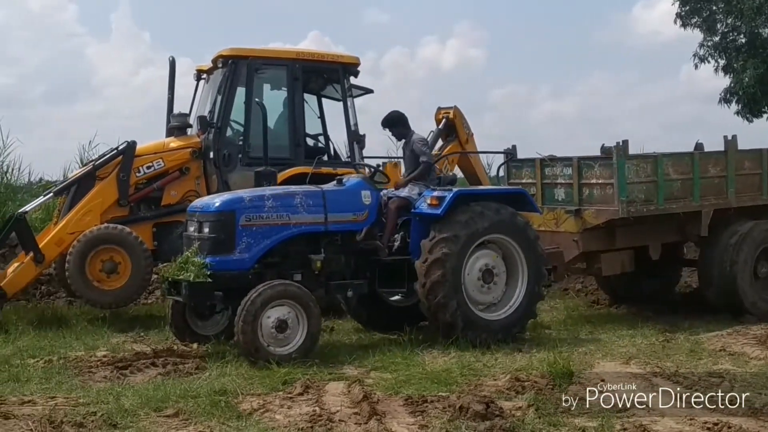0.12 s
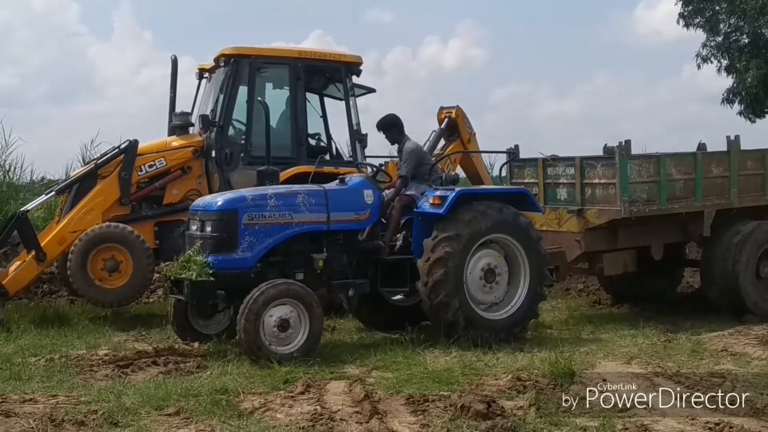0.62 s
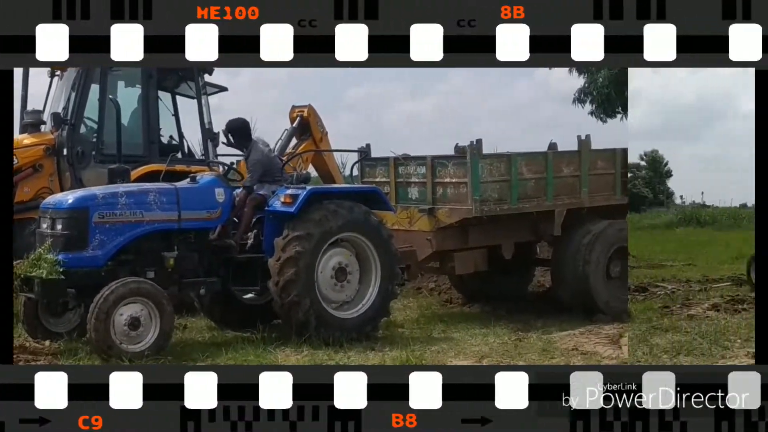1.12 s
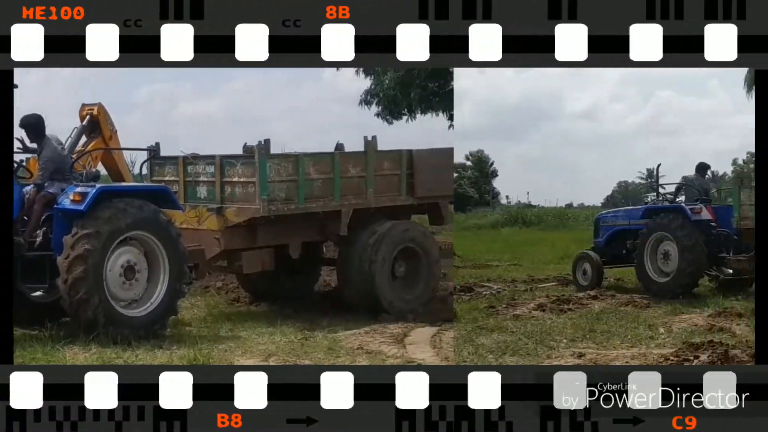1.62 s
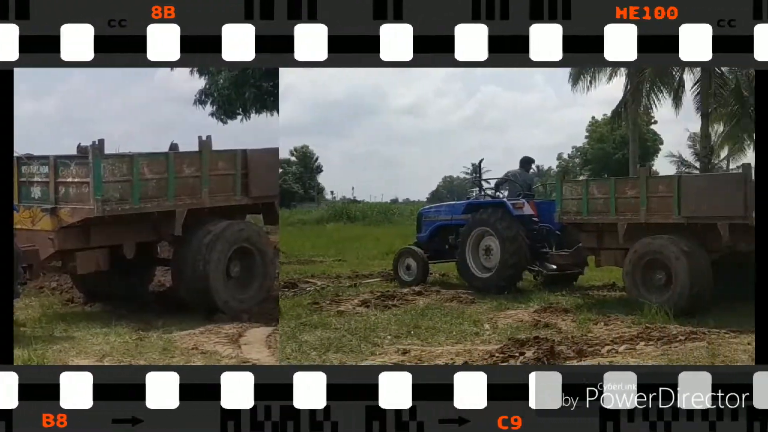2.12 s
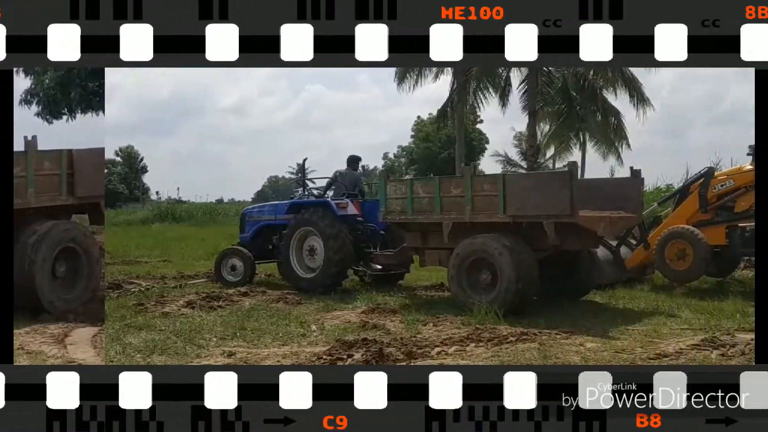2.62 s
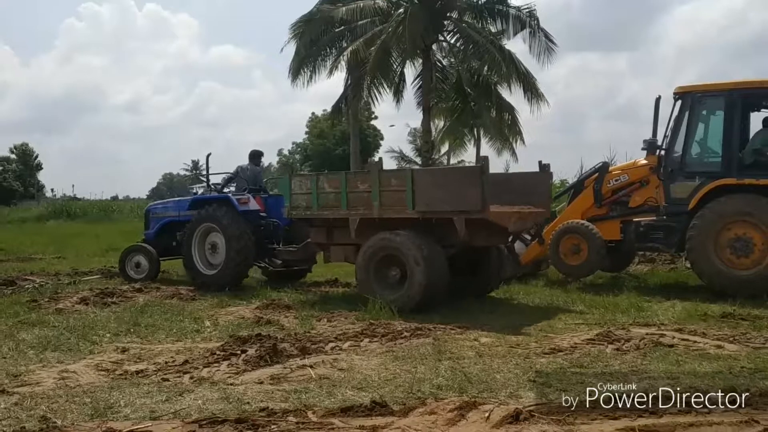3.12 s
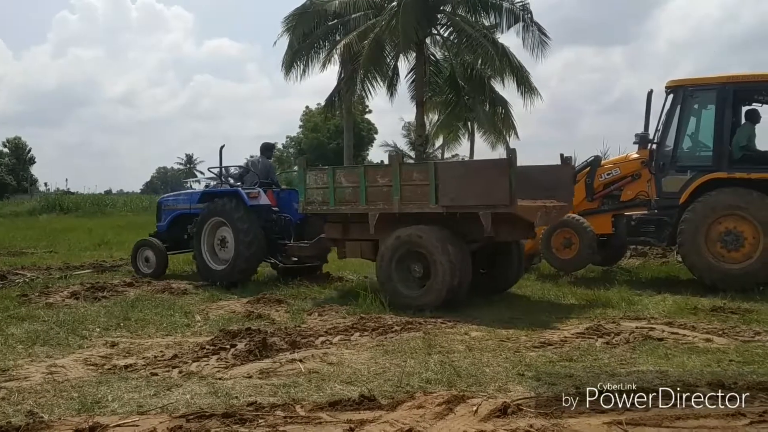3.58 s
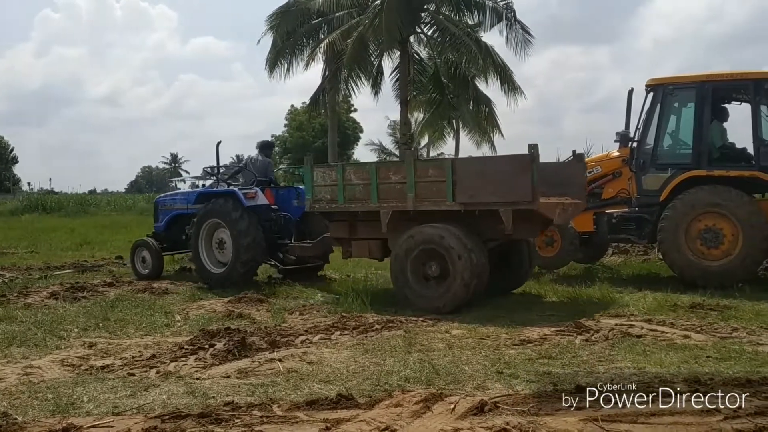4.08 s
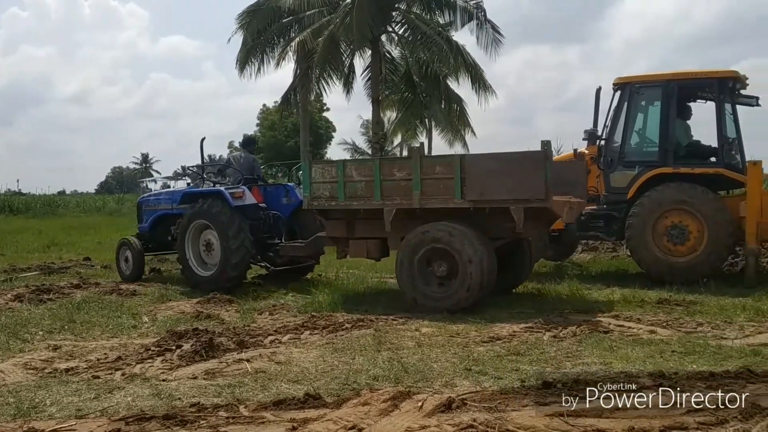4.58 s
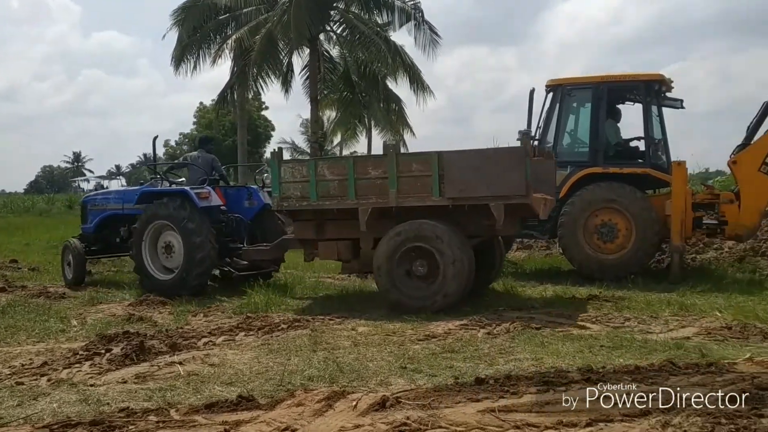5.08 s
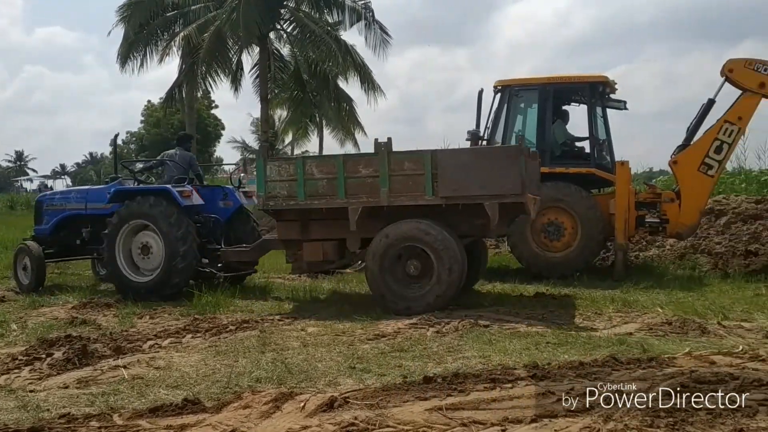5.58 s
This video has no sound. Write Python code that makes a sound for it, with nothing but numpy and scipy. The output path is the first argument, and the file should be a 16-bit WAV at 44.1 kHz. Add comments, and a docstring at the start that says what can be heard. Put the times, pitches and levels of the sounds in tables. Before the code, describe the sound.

In an open field, a tractor's slow, uneven diesel knock sits over a loader's deep steady throb, close and loud. Just before two seconds it cuts to a quieter, more distant view: the loader revs higher with a rough drone while a steel trailer rattles and clanks, hardest near four seconds. A small bird trills, mostly left. Stereo phone microphone, dry outdoors.

```python
"""A three-cylinder tractor knocks at idle over the throb of a four-cylinder loader, close by in an open field.
After a cut, a second scene fades in further off: the loader revs higher, pushing a steel trailer that clanks.
A small bird trills, mostly on the left. Exhausts are sums of harmonics of the firing rate; knocks and clanks
are short forces exciting resonances; roar is filtered noise pulsed by the firing; birdsong is gliding tones."""
import sys
import numpy as np
from scipy import signal
from scipy.fft import rfft, irfft
from scipy.io import wavfile
from scipy.ndimage import uniform_filter1d

SR = 44100
rng = np.random.default_rng(int(sys.argv[2]) if len(sys.argv) > 2 else 0)


def int16_out(signal):
    """Quantize to a 16-bit WAV file."""
    q = np.round(np.clip(np.atleast_2d(signal).T, -1, 1) * 32767)
    wavfile.write(sys.argv[1], SR, q.astype(np.int16))


def makeup_ratio(level_db):
    """Linear amplitude ratio for a level in decibels (20 dB per factor of ten)."""
    decades = np.asarray(level_db, float) / 20
    return 10 ** decades


N = 251811
T = np.arange(N) / SR
CUT_S = 1.876  # the close scene ends
FADE_START_S, FADE_S = 1.904, 0.08  # start and time constant of the distant scene's swell


def curve(table):
    """Linear interpolation: each column of a time table, one value a sample."""
    s, *columns = np.transpose(table)
    return [np.interp(T, s, c) for c in columns]


def on_log(hz, table):
    """Logarithmic frequency axis: a spectrum table read between its points."""
    f, v = np.transpose(table)
    return np.interp(np.log(hz + 1), np.log(f), v)


def level(x, db):
    """Root-mean-square normalization to a level in dB."""
    return x * makeup_ratio(db) / np.sqrt(np.mean(x ** 2))


def colour(x, table, size=8192):
    """Minimum-phase filtering: the folded cepstrum gives a causal response of the tabled magnitude."""
    cepstrum = irfft(on_log(np.fft.rfftfreq(size, 1 / SR), table) * np.log(10) / 20)
    cepstrum[1:size // 2] *= 2
    cepstrum[size // 2 + 1:] = 0
    response = irfft(np.exp(rfft(cepstrum)))
    return signal.fftconvolve(np.atleast_2d(x), response[None], axes=1)[:, :N]


# coherence of the two microphone ports: (frequency [Hz], left-right correlation [1])
LIKENESS = [(130, 1), (430, 0.87), (700, 1), (950, 0.41), (1300, 0.52), (1750, 0.032), (2500, 0.25),
            (3000, 0.028), (4000, 0.085), (4800, 0.23), (6500, 0.07)]


def ports(alike=0):
    """Spatial coherence: white noise at two ports, alike in the bass, less so in the treble; alike raises it."""
    c = np.clip(on_log(np.fft.rfftfreq(N, 1 / SR), LIKENESS), -1, 1)
    c = np.clip(c + alike * (1 - c), -1, 1)
    mid, side = rfft(rng.standard_normal((2, N)))
    mid = mid * np.sqrt((1 + c) / 2)
    side = side * np.sqrt((1 - c) / 2)
    return irfft(mid + side * np.array([[1], [-1]]), N)


def ring(x, hz, width):
    """Simple resonance of given bandwidth, with unit gain at its centre."""
    return signal.lfilter(*signal.iirpeak(hz, hz / width, fs=SR), x)


def walk(rate):
    """Slow random modulation: levels held 1 / rate s and slewed twice; spread near 1."""
    k = int(SR / rate)
    held = np.repeat(rng.standard_normal(N // k + 1), k)
    return 1.4 * uniform_filter1d(uniform_filter1d(held, k), k)[:N]


def bursts(times, sizes, lengths, rise_s):
    """Impact envelopes: a quick rise, then an exponential decay."""
    env = np.zeros(N)
    for t, size, length in zip(times, sizes, lengths):
        a = int(max(t, 0) * SR)
        u = T[:min(int(8 * length * SR), N - a)]
        env[a:a + len(u)] += size * (1 - np.exp(-u / rise_s)) * np.exp(-u / length)
    return env


def cycles(turns):
    """Phase crossing: the times after the cut at which a running count of firings passes a whole number."""
    times = T[1:][np.diff(np.floor(turns)) > 0]
    return times[times > CUT_S]


# thin high hiss: (frequency [Hz], relative density [dB per Hz])
THIN = [(7000, -37), (10500, -8.5), (13000, -11.5), (15000, -2.5)]


def thin_hiss():
    """Filtered noise: a thin high hiss in the distant scene, slowly dying away."""
    start_db, slope_db_per_s = -56.5, -2
    return level(colour(ports(), THIN), 0) * makeup_ratio(start_db + slope_db_per_s * (T - FADE_START_S))


# bird trills: (first note [s], last note [s], relative level [dB], left minus right [dB],
# mean starting pitch [Hz])
TRILL = [(1.4289, 1.5182, -32, 19, 6460), (1.837, 1.87, -26.5, 19, 6580), (2.823, 2.9392, -45, 13, 6360),
         (3.1815, 3.1822, -45, 7, 6670), (3.5172, 3.6077, -48.5, 12, 6630), (4.113, 4.144, -48, 13, 7480),
         (4.2, 4.1994, -46, 10, 6240), (4.435, 4.59, -50.5, 8, 7250)]


def trill_notes():
    """Periodic repetition: evenly spaced notes of each trill, (s, level dB, pan dB, pitch Hz)."""
    note_gap_s, ends_db, pitch_scatter = .0305, -2.5, .02  # in trills of three notes or more, the ends are softer
    for first, last, db, pan_db, hz in TRILL:
        count = round((last - first) / note_gap_s) + 1
        place = np.linspace(-1, 1, count) * (count > 2)
        pitch = hz * (1 + pitch_scatter * rng.standard_normal(count))
        times = np.linspace(first, last, count)
        yield from zip(times, db + ends_db * place ** 2, np.full(count, pan_db), pitch)


# bird whistles: (start [s], length [s], from [Hz], to [Hz], level [dB], left minus right [dB])
WHISTLES = [(3.117, 0.045, 7650, 6430, -52.5, 9), (4.4, 0.024, 6620, 6640, -53, -5)]


def bird():
    """Frequency modulation: trill notes are hoarse upward sweeps, whistles clean glides; a short echo follows."""
    out = np.zeros((2, N))
    notes = [(s, .008, hz, 1.32 * hz, db, pan, 1.3) for s, db, pan, hz in trill_notes()]
    whistles = [tuple(w) + (0,) for w in WHISTLES]
    for s, length, from_hz, to_hz, db, pan_db, hoarse in notes + whistles:
        u = T[:int(length * SR)] / length
        glide = u ** (1.2 if hoarse else .5)
        phase = 2 * np.pi * np.cumsum(from_hz + (to_hz - from_hz) * glide) / SR
        # an uneven voice: shaking level, and a second, higher tone
        shake = 1 + hoarse * 3 * uniform_filter1d(rng.standard_normal((2, 2000)), size=11)[:, :len(u)]
        note = shake[0] * np.sin(phase) + hoarse * makeup_ratio(-13.0) * shake[1] * np.sin(1.4 * phase)
        swell = np.sin(np.pi * u ** 0.55)
        gain = makeup_ratio(db + np.array([[.5], [-.5]]) * pan_db)
        a = int(s * SR)
        out[:, a:a + len(u)] += gain * swell * note / (1 + hoarse)
    tail = rng.standard_normal((2, 3000)) * np.exp(-T[:3000] / 0.011) * makeup_ratio(-30)
    return out + signal.fftconvolve(out, tail, axes=1)[:, :N]


# trailer clanks: (time [s], panel level [dB], then relative to it: floor boom before a 9 dB lift [dB],
# latches [dB], chains [dB]; rattle decay [s])
CLANKS = [(1.378, -31.5, -8.5, -5, -12, .025), (1.858, -37, -5, 9, 6, 0.004),
          (2.451, -51, -5, 6, -1, 0.0068), (3.249, -49, 6, 4, 4, 0.021),
          (3.398, -38.5, 1.5, -8.5, -4, 0.028), (3.538, -43, 1, -13, -10, 0.019),
          (3.949, -30.5, -10, -8, -8.5, 0.014), (3.968, -32, -16, -11.5, -11.5, 0.014),
          (4.0, -42, -1, -22, -26, 0.034), (4.084, -39.5, -10, -0.5, -1, 0.017),
          (4.15, -39.5, -6, 1.5, 3, 0.016), (4.168, -41.5, -3.5, -1.5, -9, 0.025),
          (4.4, -49, 2, -21, -20, 0.017), (4.653, -40, 2.5, -4.5, -5.5, 0.015),
          (4.674, -41, 4, -4, -19, 0.0098), (4.785, -49, 0, -3, -2, 0.027),
          (4.8, -47, -12, -2.5, -2, 0.024), (4.828, -40.5, -2, -0.5, -6, 0.016),
          (4.88, -47.5, 1, -5, 1, 0.011), (5.185, -45, 2, -8.5, -18, 0.025),
          (5.522, -56.5, 6, 7, 10, 0.012), (5.652, -60, -11, 3, 11, 0.034),
          (5.672, -61.5, -7, 5, -3, 0.019), (5.701, -38, -11, -8, -3.5, .01)]
# modes of the steel: (frequency [Hz], relative level [dB], nominal 60 dB decay [s])
TRAILER = [(260.4, -5, 0.22), (298.4, -12, 0.42), (569.7, -1, 0.072), (622.4, -6, 0.39), (720, -3, 0.15),
           (795, -12, 0.14), (1087, 6.5, 0.07), (1369, 0, 0.099), (1898, 1.5, 0.056), (2523, 4, 0.038),
           (3683, 7, 0.04), (4840, -1, 0.025), (4400, 3.5, 0.046)]
# rattle spectrum: (frequency [Hz], relative level [dB])
RATTLE = [(300, 4), (600, -3.5), (850, 11.5), (1200, 11), (2500, 0.5), (3300, 7), (4800, 10), (7000, -10.5),
          (11000, -15)]


def trailer():
    """Modal excitation: loose steel rattles briefly and rings: floor, side panels, latches, chains, low to high."""
    # faint chance rattles while the trailer rolls
    jolts_per_s, least_db, jolt_s = 3, -57, .014
    span_s = N / SR - CUT_S
    when, size, low, high = rng.random((int(jolts_per_s * span_s), 4)).T
    jolts = np.c_[CUT_S + when * span_s, least_db + 6 * size, -10 * low, -10 * high, -10 * low, jolt_s + 0 * when]
    s, db, boom_db, latch_db, chain_db, length = np.r_[CLANKS, jolts].T
    length = np.clip(length, .004, .1)
    grit = ports(alike=.5) * makeup_ratio(1.2 * walk(200))
    out = 0
    # relative level dB, band from Hz, to Hz
    parts = ((boom_db + 9, 0, 400), (0 * db, 400, 950), (latch_db, 950, 3500), (chain_db, 3500, SR))
    for over_db, lo, hi in parts:
        blows = grit * bursts(s, makeup_ratio(db + over_db), length, rise_s=.0011)
        # the blow itself: a push that lasts longer on the heavier, lower parts
        push_s = .08 / max(lo, 200)
        push = bursts(s + .002, makeup_ratio(db + over_db + 20), np.full(len(s), push_s), rise_s=push_s)
        struck = blows + push
        for f, d, t60 in TRAILER:
            if lo < f < hi:
                out = out + makeup_ratio(d + 18.5) * np.sqrt(t60 * 10) * ring(struck, f, 1.54 / t60)
        band = [(f, d - 40 * (not lo < f < hi)) for f, d in RATTLE]
        out = out + colour(blows, band) * makeup_ratio(5.5)
    return out


def roar(spectrum, db, phase, depth, late, alike=0):
    """Amplitude modulation: noise of fans, gears and gas flow puffs once a firing and flickers by octave."""
    puff = makeup_ratio(depth * np.cos(phase - late) + 0.84 * walk(22.23))
    rest, out = colour(ports(alike) * puff, spectrum), 0
    for hz in 150 * 2. ** np.arange(7):
        low = signal.sosfilt(signal.butter(1, hz, fs=SR, output="sos"), rest)
        rest = rest - low
        out = out + low * makeup_ratio(1.32 * walk(14))
    return level(out + rest, 0) * makeup_ratio(db)


# roar far off: spectrum (frequency [Hz], relative density [dB per Hz]), then (time [s], level [dB])
ROAR_FAR = [(15, 4), (40, -5), (70, 0.5), (110, -2), (170, -2.5), (300, -10), (700, -13.5), (2000, -20),
            (5000, -27), (9000, -33), (15000, -46.5)]
ROAR_FAR_DB = [(2.25, -42.5), (3.16, -41.5), (3.44, -39.5), (3.9, -41.5), (4.08, -39.5), (4.28, -42.5),
               (5.0, -42.5), (5.32, -46), (5.71, -43)]


def far_roar(phase):
    """Broadband flow noise, modulated by the distant loader's firing."""
    return roar(ROAR_FAR, curve(ROAR_FAR_DB)[0], phase, depth=1.8, late=1.1, alike=0.11)


# roar close by: spectrum (frequency [Hz], relative density [dB per Hz]), then (time [s], level [dB])
ROAR_NEAR = [(15, -35), (45, -0.5), (75, -1.5), (110, -9), (170, -4), (300, -12.5), (700, -14), (2000, -18),
             (5000, -26.5), (9000, -34.5), (15000, -42)]
ROAR_NEAR_DB = [(0.0, -30), (1.1, -29.5), (1.718, -31.5), (1.87, -33)]


def near_roar(phase):
    """Broadband flow noise, modulated by the close loader's firing."""
    return roar(ROAR_NEAR, curve(ROAR_NEAR_DB)[0], phase, depth=1.46, late=3.54)


# gear whines of the distant loader: (frequency [Hz], width of each of two filters [Hz], level [dB])
WHINES = [(1138, 73, -60.5), (1234, 15, -82), (578, 32, -67), (6230, 38, -70.5)]


def loader_gear(phase):
    """Narrow-band noise and impulsive excitation: wavering whines, and an uneven valve tick each firing."""
    whine = sum(level(ring(ring(ports(), f, w), f, w), d) for f, w, d in WHINES)
    mean_db, scatter_db, tick_s = -48, 3, .004
    times = cycles(phase / (2 * np.pi))
    size = makeup_ratio(mean_db + scatter_db * rng.standard_normal(len(times)))
    ticks = ports() * bursts(times, size, np.full(len(times), tick_s), rise_s=0.0011)
    spectrum = [(400, -18), (900, -9), (1750, -21), (2450, 12), (3500, -28), (4600, -27), (6000, -27),
                (10000, -11)]  # Hz, dB
    return whine + colour(ticks, spectrum, size=1024)


def valve():
    """Impulse response: a loose valve's click excites one bright resonance every fourth firing."""
    first_s, click_db, hz, width_hz = .086, -15, 4820, 190
    firing_hz = LOADER_NEAR[1][1]
    times = np.arange(first_s, CUT_S, 4 / firing_hz)
    size = makeup_ratio(click_db + 0.5 * rng.standard_normal(len(times)))
    size = size * np.where(times < 1.4, 1, makeup_ratio(-4.5))
    clicks = ports() * bursts(times, size, np.full(len(times), .004), rise_s=0.0016)
    return ring(clicks, hz, width_hz)


def exhaust(hz, db, orders, fire_s, skew, wobble_db):
    """Fourier synthesis: a pulse a firing, as wavering partials; skew pi is a dip, -pi / 2 a dip and rebound."""
    turns = np.cumsum(hz) / SR
    phase = 2 * np.pi * (turns - turns[int(fire_s * SR)])
    tone = 0
    for k, d in orders:
        strength = makeup_ratio(d + wobble_db * np.sqrt(k) * walk(6))
        tone = tone + strength * np.cos(k * phase + skew + .08 * k * walk(8))
    return np.sqrt(2) * makeup_ratio(db) * tone, phase


# pump hum on the loader, sagging under load: (time [s], mean frequency [Hz], level [dB])
PUMP = [(1.9, 239.7, -58), (3.05, 239.6, -57.5), (3.2, 227, -55), (4.2, 228.2, -56), (4.6, 227, -58),
        (5.71, 228, -64)]


def pump():
    """Tonal radiation: a single partial, wavering in pitch and strength."""
    hz, db = curve(PUMP)
    return exhaust(hz * (1 + .006 * walk(9)), db, [(1, 0)], fire_s=3.0, skew=0, wobble_db=5)[0]


# distant loader: (time [s], firing rate [Hz], level [dB])
LOADER_FAR = [(1.9, 45.64, -40.5), (4.0, 45.64, -40.5), (5.3, 45.64, -39.5), (5.71, 45.45, -39.5)]
# its partials: (multiple of the firing rate [1], relative level [dB])
FAR_ORDERS = [(1, 0), (2, -4.5), (3, -8), (3.25, -18), (5, -24), (6, -19)]


def far_loader():
    """Harmonic series on the higher firing rate of the working loader; also returns its phase."""
    return exhaust(*curve(LOADER_FAR), FAR_ORDERS, fire_s=2.31, skew=-2.6, wobble_db=1.6)


# close loader: (time [s], firing rate [Hz], level [dB])
LOADER_NEAR = [(0, 31.9, -28.3), (.4, 31.97, -28.3), (1.87, 31.97, -28.8)]
# its partials: (multiple of the firing rate [1], relative level [dB])
NEAR_ORDERS = [(1, 0), (2, -3), (3, -4), (3.5, -19), (4, -20), (5, -18), (6, -19), (7, -20), (10, -20),
               (10.5, -24)]


def near_loader():
    """Harmonic series on the firing rate, with a few half-order partials; also returns its phase."""
    return exhaust(*curve(LOADER_NEAR), NEAR_ORDERS, fire_s=1.5694, skew=-1.4, wobble_db=.9)


# distant tractor: (time [s], firing rate [Hz], level [dB])
TRACTOR_FAR = [(1.9, 18.2, -62), (2.5, 21, -56), (2.85, 19.2, -56), (3.2, 17.4, -48), (3.6, 21.4, -67),
               (4.2, 16.3, -64), (4.6, 17.5, -46), (5.1, 20, -53), (5.71, 16, -45)]


def far_tractor():
    """Harmonic series of three partials, the second strongest; also returns the firing rate."""
    hz, db = curve(TRACTOR_FAR)
    return exhaust(hz, db, [(1, -12), (2, 0), (4, -7)], fire_s=3.0, skew=0, wobble_db=2.5)[0], hz


# close tractor: (time [s], firing rate [Hz], level [dB])
TRACTOR_NEAR = [(0, 18.6, -41), (.4, 18.7, -42), (1.45, 18.7, -42), (1.6, 17.5, -43), (1.87, 16.5, -44)]
# its partials: (multiple of the firing rate [1], relative level [dB])
TRACTOR_ORDERS = [(1, 2), (2, -6), (3, -5), (4, -6), (5, -3), (6, -7), (8, -7), (17, -10), (18, -12)]


def near_tractor():
    """Harmonic series on the slow idle firing rate."""
    return exhaust(*curve(TRACTOR_NEAR), TRACTOR_ORDERS, fire_s=.299, skew=0, wobble_db=.8)[0]


# close knocks, three cylinders in turn: (time [s], level [dB], the block's main ring relative to it [dB])
KNOCKS = [(.0388, -33, 1.5), (.0936, -36, -1), (.1504, -32.5, -1), (.2004, -31, 4), (.2544, -39, 4),
          (.3097, -27.5, -1), (.3621, -31.5, 3), (.4172, -34, -9), (.4734, -30, -22), (.5234, -30, 3),
          (.5765, -31.5, -14), (.633, -27.5, -1), (.6846, -29.5, 1), (.7358, -30.5, -9), (.7933, -30, -13),
          (.8434, -29, 0), (.8976, -28.5, -9), (.9524, -29, -1), (1.0026, -29.5, 1.5), (1.0575, -32.5, -10),
          (1.1119, -30, -2), (1.1624, -29, 0), (1.2171, -31.5, -3), (1.272, -29, 0.5), (1.3238, -30.5, 5),
          (1.3753, -33, -9)]
# the lowest mode of the block, cylinder by cylinder: (level [dB])
THUD_DB = [-30, -22, -40]
# modes of the block: (frequency [Hz], width [Hz], relative level [dB])
BLOCK = [(331.7, 42, -9.5), (815, 210, -30), (1397, 88, 2), (1954, 130, -2.5), (2450, 160, -2.5),
         (3510, 120, -0.5), (4750, 49, -9)]
# valve-gear rattle: (frequency [Hz], relative level [dB])
KNOCK_HISS = [(300, -25.5), (1000, 4.5), (2500, -5.5), (6000, -14.5), (10000, -19), (15000, -33)]


def knock(far_hz):
    """Forced modal vibration: each combustion raps the tractor's block, which rings, and rattles the valve gear."""
    near, near_db, over_db = np.transpose(KNOCKS)
    far = cycles(np.cumsum(far_hz) / SR)
    mean_db, scatter_db = -58, 2  # from a distance
    far_db = mean_db + scatter_db * rng.standard_normal(len(far))
    times = np.r_[near, far]
    db = np.r_[near_db, far_db]
    ring_db = np.r_[near_db + over_db, far_db]
    thud_db = np.r_[np.resize(THUD_DB, len(near)), far_db]
    hiss = ports()

    def raps(db):
        """Impact noise: a short noise burst at each combustion."""
        return hiss * bursts(times, makeup_ratio(db), np.full(len(times), .010), rise_s=0.0011)

    def push(db):
        """Pressure impulse: a short push of the same shape every time."""
        return bursts(times, makeup_ratio(db + 22.5), np.full(len(times), .00012), rise_s=0.00024)

    block = 0
    for k, (f, w, d) in enumerate(BLOCK):
        struck = (thud_db, db, ring_db)[k] if k < 3 else db
        # the push passes two resonances, so that the casting swells into its ring
        force = ring(push(struck), f, 1.05 * w) + raps(struck - 12)
        block = block + makeup_ratio(d) * np.sqrt(100 / w) * ring(force, f, w)
    return block * makeup_ratio(23.0) + colour(raps(db), KNOCK_HISS) * makeup_ratio(13.5)


# response of the field to the machines, close and far: (frequency [Hz], gain [dB])
FIELD_NEAR = [(330, -3), (440, -11.5), (570, -2), (800, -1.5), (1000, -6.5), (1200, -2), (1450, -1),
              (1750, -8), (2100, 0), (2650, 0), (2900, -3), (3280, -7.5), (3600, -2), (3960, -7.5),
              (4200, 0.5), (4800, 3), (5600, -2), (6050, -3.5), (6400, -1.5), (7000, -1)]
FIELD_FAR = [(330, -3), (440, -11), (570, 0.5), (800, -1.5), (970, -6.5), (1200, -1), (1450, 0), (1750, -4),
             (2100, 2.5), (2550, 1), (2800, -4), (3100, -2.5), (3550, -7.5), (4000, 1.5), (4500, 4.5),
             (5100, 1.5), (5750, 0), (6050, -2.5), (6400, 1.5), (7500, 2.5), (8100, -1.5)]
# port difference, close and far: (frequency [Hz], left minus right [dB])
TILT_NEAR = [(200, 1.75), (520, 0.5), (900, 3.5), (1100, -4), (1400, 1.5), (1800, 1.5), (2500, -1.5),
             (2900, 5), (3500, 5), (4000, 1.5), (4800, -5), (5700, 0.5), (6500, 5), (9500, 10), (15000, 1)]
TILT_FAR = [(200, 1.1), (1000, 0.5), (2900, 0), (3500, 8), (4200, -4), (4800, -5), (6000, 3.5), (7000, 1),
            (8800, 7.5), (15000, 2.5)]


def place(machines, field, tilt, lag):
    """Interaural-type cues: coloured by the field, the ports differ in level, and the left lags by lag samples."""
    left, right = colour(machines, field)
    left = colour(left, [(f, d * .5) for f, d in tilt])[0]
    right = colour(right, [(f, d * -.5) for f, d in tilt])[0]
    return np.array([np.roll(left, lag), right])


def scene():
    """Superposition of sources: the close scene is cut off; the distant one fades in."""
    loader, phase = near_loader()
    near = loader + near_tractor() + valve() + near_roar(phase)
    loader, phase = far_loader()
    tractor, tractor_hz = far_tractor()
    far = loader + tractor + far_roar(phase) + pump() + loader_gear(phase) + thin_hiss()
    both = knock(tractor_hz) + trailer()
    fade = 1 - np.exp(-np.clip(T - FADE_START_S, 0, None) / FADE_S)
    out = bird() * np.where(T < CUT_S, 1, fade)
    out = out + place(near + both, FIELD_NEAR, TILT_NEAR, lag=4) * (T < CUT_S)
    return out + place(far + both, FIELD_FAR, TILT_FAR, lag=2) * fade


def band_limit(x):
    """A steep low-pass at the top of the band."""
    return signal.sosfilt(signal.butter(12, 15690, fs=SR, output="sos"), x)


def record(dry):
    """Band limitation: the phone cuts the top above 15.2 kHz with a steep elliptic low-pass."""
    lowpass = signal.ellip(8, .2, 60, 15200, fs=SR, output="sos")
    mix = signal.sosfilt(lowpass, dry)
    return band_limit(mix)


dry = scene()
out = record(dry)
int16_out(out)
```